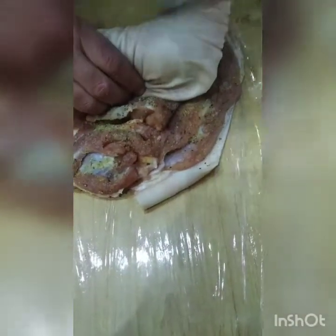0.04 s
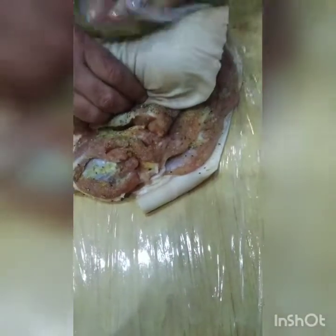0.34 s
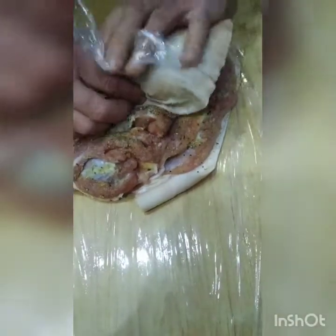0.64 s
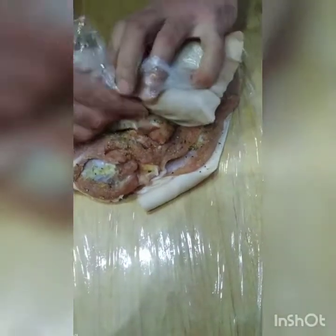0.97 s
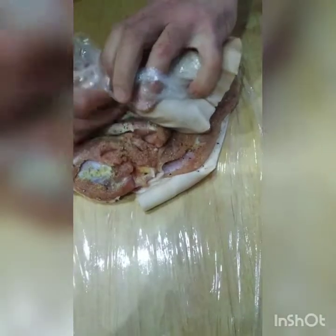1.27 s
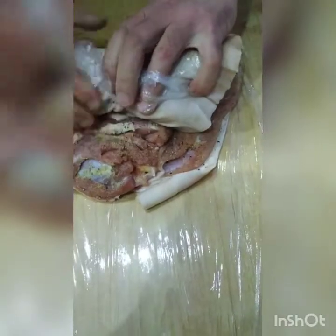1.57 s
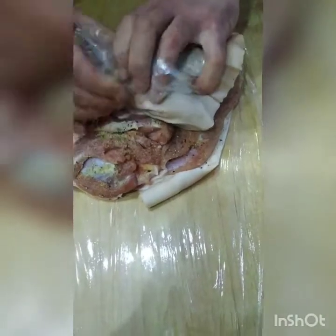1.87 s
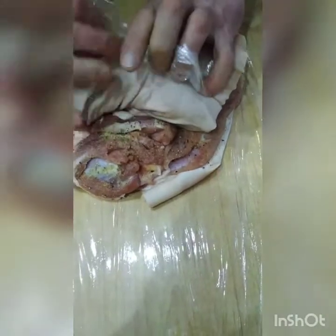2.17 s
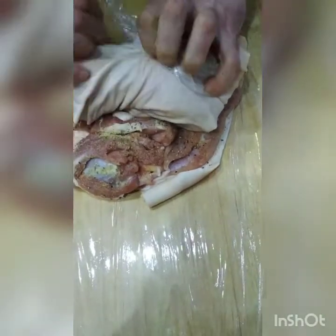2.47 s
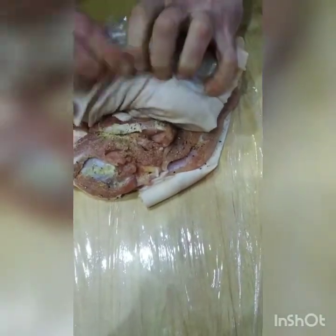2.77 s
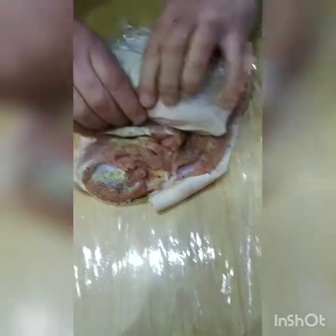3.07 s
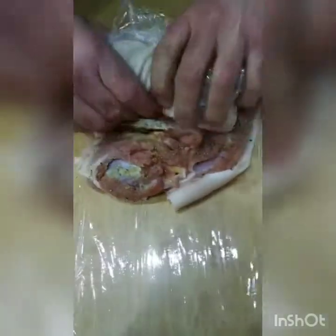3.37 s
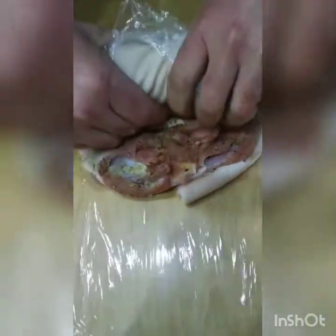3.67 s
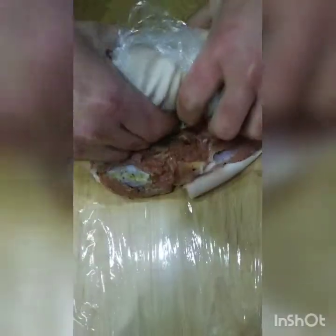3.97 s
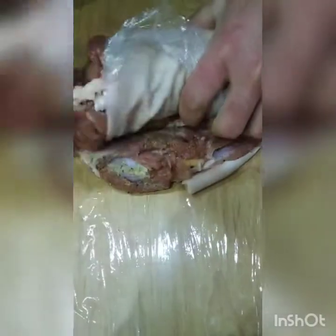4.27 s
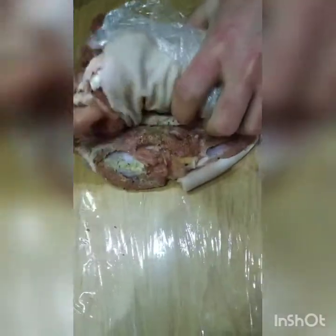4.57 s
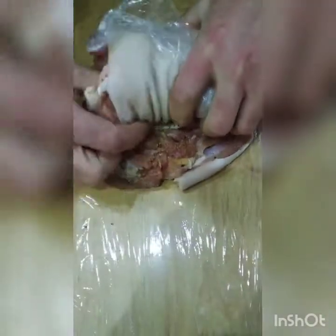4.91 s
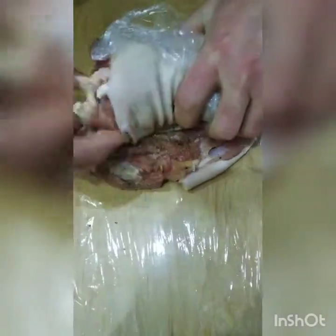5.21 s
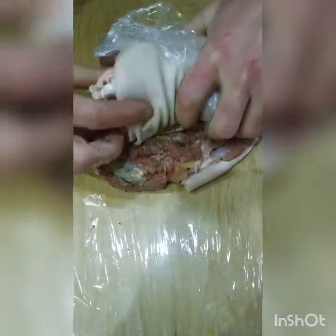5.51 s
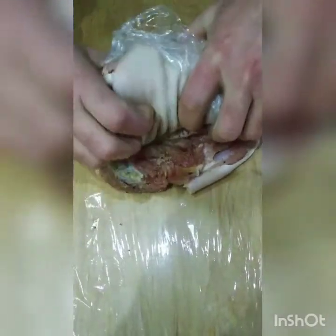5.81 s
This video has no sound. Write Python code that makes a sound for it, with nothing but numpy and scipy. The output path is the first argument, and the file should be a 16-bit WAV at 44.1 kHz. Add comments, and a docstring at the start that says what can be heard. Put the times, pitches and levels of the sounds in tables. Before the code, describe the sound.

Plastic cling film crinkles in uneven bursts as hands roll meat tightly in it on a board. Sharp little snaps, hollow pops and a few tiny squeaks stand out, with soft, dull rubs and bumps underneath. The crackling is strongest at the start and around two seconds, then becomes lighter and sparser. The microphone is close, in a small kitchen with a faint appliance hum.

```python
"""Dense showers of tiny clicks: cling film crinkles as hands roll meat tightly in it on a board.
Each click is a crease buckling under strain; taut creases snap sharply, wide folds pop or crunch,
and the moist film squeaks under a finger. Underneath, the roll rubs and bumps dully on the board
and a mains appliance hums. It all plays close to a two-port microphone in a small kitchen."""
import sys
import numpy as np
from scipy import signal
from scipy.fft import rfft, irfft
from scipy.io import wavfile

SR = 44100
rng = np.random.default_rng(int(sys.argv[2]) if len(sys.argv) > 2 else 0)


def digitize_waveform(pressure):
    """Quantize a signal to 16-bit integers and store it at the path in sys.argv[1].

    Rows of a 2-D input are taken as channels; values are limited to [-1, 1].
    """
    field = np.atleast_2d(pressure).T
    bounded = np.clip(field, -1, 1)
    quanta = np.round(bounded * 32767).astype(np.int16)
    wavfile.write(sys.argv[1], SR, quanta)


N = 257984
TIME, FREQS = np.arange(N) / SR, np.fft.rfftfreq(N, 1 / SR)


def amp(db):
    """Decibels to gain."""
    return 10 ** (np.asarray(db) / 20)


def unit_rms(x):
    """Scales a stereo pair so that its mid signal has rms 1."""
    return x / np.sqrt(np.mean(x.mean(0) ** 2) + 1e-20)


def curve_at(points, hz):
    """Reads a curve on a log-frequency axis."""
    f, value = np.transpose(points)
    return np.interp(np.log(hz + 1), np.log(f + 1), value)


def add(mix, s, sound):
    """Mixes a stereo sound in at time s."""
    part = mix[:, max(round(s * SR), 0):][:, :sound.shape[1]]
    part += sound[:, :part.shape[1]]


def convolve(x, response):
    """Causal filtering of each channel."""
    return signal.oaconvolve(np.atleast_2d(x), np.atleast_2d(response), axes=1)[:, :np.shape(x)[-1]]


def colour(x, points, size=2048):
    """Minimum-phase EQ, so clicks keep their sharp front."""
    gain_db = np.maximum(curve_at(points, abs(np.fft.fftfreq(size, 1 / SR))), -100)
    spectrum = np.exp(np.conj(signal.hilbert(np.log(amp(gain_db)))))
    return convolve(x, np.fft.ifft(spectrum).real)


def flutter(rate_hz):
    """Smooth random modulation of unit spread."""
    spectrum = rfft(rng.standard_normal(N)) / (1 + (FREQS / rate_hz) ** 2)
    wobble = irfft(spectrum * (FREQS > rate_hz / 4), N)
    return wobble / wobble.std()


def strokes(rows, attack_s, release_s):
    """One envelope per hand movement: strain builds, is held and relaxes."""
    start, length, db = np.transpose(rows)[:3, :, None]
    t = TIME - start
    return amp(db) * np.clip(t / attack_s, 0, 1) * np.exp(-np.clip((t - length) / release_s, 0, 20))


def power_sum(gains):
    """Unrelated noises add in power."""
    return np.sqrt(sum(g ** 2 for g in gains))


# Room decay: (frequency [Hz], time to fall 60 dB [s])
KITCHEN_DECAY = [(200, 0.012), (1000, 0.075), (5000, 0.071), (15000, 0.022)]
def kitchen(x, wet_db, size=16384):
    """Adds a short tail of sparse reflections that lingers longest in the mids."""
    t = np.arange(size) / SR
    taps = rng.standard_normal((2, size)) * (rng.random((2, size)) < .1) * (t > .003)
    hz, when, bands = signal.stft(taps, SR, nperseg=256)
    tail = signal.istft(bands * amp(-60 * when / curve_at(KITCHEN_DECAY, hz)[:, None]), SR)[1]
    return x + amp(wet_db) * convolve(x, tail / np.linalg.norm(tail[0]))


# Stereo image of the noise beds: (frequency [Hz], left-right correlation [-1 to 1])
PORT_LIKENESS = [(60, 0.7), (160, 0.89), (270, 0.94), (450, 0.37), (740, -0.26), (1200, 0.86),
                 (3000, -0.51)]
def diffuse(points):
    """Shaped stereo noise whose bass is alike at both ports."""
    left, other = rfft(rng.standard_normal((2, N)))
    likeness = curve_at(PORT_LIKENESS, FREQS)
    right = likeness * left + np.sqrt(1 - likeness ** 2) * other
    return unit_rms(irfft(np.array([left, right]) * amp(curve_at(points, FREQS)), N))


# Tone of the room's air: (frequency [Hz], relative level [dB])
AIR_SPECTRUM = [(18, -65), (30, -25.5), (103, -29.5), (161, -6.5), (210, -1), (345, -4), (426, -2.5),
                (499, -10), (666, -10), (844, -9.5), (1430, -13.5), (2060, -15.5), (2980, -15.5),
                (3580, -26), (16000, -17.5)]
def room_air(level_db=-58):
    """A soft, steady bed of air noise."""
    return amp(level_db) * diffuse(AIR_SPECTRUM)


# Partials of the hum: (harmonic [multiple of mains], level [dB])
HUM_PARTIALS = [(2, -84), (4, -65.5), (5, -67), (6, -70), (10, -67), (13, -70.5), (15, -71.5), (19, -80.5),
                (24, -75.5), (28, -72.5), (29, -67.5)]
def appliance_hum(mains_hz=50, waver_db=2.0, drift_turns=0.0025):
    """The wavering buzz of a mains appliance, its phases different at each port."""
    turns = mains_hz * TIME + drift_turns * flutter(7.5)
    hum = np.zeros((2, N))
    for harmonic, db in HUM_PARTIALS:
        offset = rng.random() + min(harmonic / 60, .3) * rng.random((2, 1))
        hum += amp(db) * np.sin(2 * np.pi * (harmonic * turns + offset))
    return hum * amp(waver_db * flutter(7.9))


# Body of the board: (frequency [Hz], relative level [dB])
BOARD_SPECTRUM = [(29, -72), (50, -37), (110, -33), (149, -17), (191, -4.5), (237, -5.5), (300, 3),
                  (443, 0.5), (489, -5.5), (678, -10), (731, -2.5), (1000, -18), (1300, -42), (2200, -120)]
# Drags of the roll: (start [s], length [s], level [dB])
ROLL_DRAGS = [(-.02, 0.021, -44), (.07, 0.027, -44.5), (.205, 0.057, -45.5), (.33, 0.2, -53.5),
              (.87, 0.16, -63), (1.65, 0.041, -59), (1.87, 0.14, -53), (1.995, 0.15, -42.5),
              (2.235, 0.093, -47.5), (2.36, .12, -56.5), (2.5, 0.21, -60), (3.98, 0.074, -53),
              (4.052, 0.018, -52)]
def rubbing():
    """The roll drags over the board: a dull rumble, a little to the left."""
    force = power_sum(strokes(ROLL_DRAGS, attack_s=0.0098, release_s=0.058))
    return force * diffuse(BOARD_SPECTRUM) * amp([[1.5], [-1.5]])


# Meat and knuckles on the board: (time [s], relative level [dB], pitch [Hz])
BOARD_BUMPS = [(0.088, -53.5, 334), (0.096, -38, 202), (.217, -33, 335), (0.334, -35, 325),
               (0.754, -43.5, 287), (1.485, -48, 262), (2.021, -33, 317), (2.087, -38, 397),
               (2.108, -40, 330), (2.253, -50, 327), (4.239, -52, 225), (4.991, -51, 210),
               (5.205, -48, 210), (5.36, -53, 223)]
def bumps(decay_s=0.00254, size=4096):
    """Soft blows push the board, which is damped within a few cycles and too small for deep bass."""
    t, out = np.arange(size) / SR, np.zeros((2, N))
    for s, db, hz in BOARD_BUMPS:
        push = t / decay_s * np.exp(1 - t / decay_s) * np.sin(2 * np.pi * hz * t)
        add(out, s, amp(db) * push * amp([[2.5], [-2.5]]))
    low_cut = signal.butter(5, 150, "high", fs=SR, output="sos")
    return kitchen(signal.sosfilt(low_cut, out), wet_db=-5.5)


# Moist film under a finger: (start [s], length [s], ring [Hz], relative level [dB])
FINGER_SQUEAKS = [(0.21, 0.026, 3870, -44), (1.822, 0.024, 1880, -55.5), (1.942, 0.028, 1720, -47.5),
                  (2.075, 0.02, 3920, -45), (2.204, 0.03, 4140, -44), (3.07, 0.015, 1730, -53.5),
                  (3.421, .012, 3180, -57), (4.38, 0.022, 4260, -56), (4.794, 0.054, 3070, -59)]
def squeaks(slips_per_s=900, ring_s=0.0038, size=512):
    """Quick, uneven slips ring one stretched patch of film."""
    t, out = np.arange(size) / SR, np.zeros((2, N))
    for s, length, hz, db in FINGER_SQUEAKS:
        slips = rng.standard_normal((2, SR // 10)) * (rng.random(SR // 10) < slips_per_s / SR)
        mode = np.exp(-t / ring_s) * np.sin(2 * np.pi * hz * t)
        radiated = np.gradient(mode)  # a small patch radiates its changes
        squeak = convolve(slips, radiated)[:, :round(length * SR)]
        add(out, s, amp(db) * unit_rms(squeak * signal.windows.tukey(squeak.shape[1])))
    return kitchen(colour(out, [(100, -46), (800, 2.5)]), wet_db=-11)


def creases(hz, ring_s, ring, scatter, left_db, scatter_s, size=512):
    """One stereo buckle per pitch: a tick with a brief ring, then scatter off hands, film and board."""
    t = np.arange(size) / SR
    tick = ring * np.exp(-t / ring_s) * np.cos(2 * np.pi * hz[:, None] * t) + (t == 0)
    paths = scatter * rng.standard_normal((len(hz), 2, size)) * np.exp(-t / scatter_s)
    lag = rng.integers(9, 15, len(hz))  # samples: the left port is farther away
    paths[:, 0] *= np.arange(size) > lag[:, None]
    paths[np.arange(len(hz)), 0, lag] += amp(left_db)
    paths[:, 1, 0] += 1
    clicks = signal.fftconvolve(paths, tick[:, None], axes=2)[..., :size]
    return clicks / np.linalg.norm(clicks, axis=(1, 2), keepdims=True)


# Bright voice of the film, also in the snaps and the shower: (frequency [Hz], gain [dB])
FILM_SPECTRUM = [(290, -51), (500, -12.5), (740, -9.5), (1260, -10), (1480, -8.5), (2190, -6), (2500, -7),
                 (3700, -5.5), (3980, -3.5), (5020, -3.5), (9490, 0.5), (11300, 0.5), (15700, 1),
                 (16600, -30)]
def lone_clicks(clicks, spread_db, largest):
    """Each crease flips once, either way, at a random moment; a few are louder than the rest."""
    out = np.zeros((2, N))
    for click, (when, rank, side) in zip(clicks, rng.random((len(clicks), 3))):
        boost_db = spread_db * min(-np.log(1 - rank), largest)
        add(out, when * N / SR, np.sign(side - .5) * amp(boost_db) * click)
    return unit_rms(colour(out, FILM_SPECTRUM))


# Fingertips on the wrap: (start [s], length [s], level [dB])
FINGER_PRESSES = [(.08, 0.17, -48), (.47, 0.12, -50), (1.48, 0.14, -54), (1.92, .52, -45.5),
                  (2.5, .12, -51), (3.5, 0.56, -60), (4.42, 0.41, -64), (4.84, 0.077, -61),
                  (5.17, 0.36, -66.5), (5.56, 0.32, -60)]
def pressing():
    """Film pressed onto moist meat gives way in small, separate, lower-pitched crackles."""
    force = power_sum(strokes(FINGER_PRESSES, attack_s=0.019, release_s=0.032))
    pitches = np.geomspace(1200, 7000, 800)
    clicks = creases(pitches, ring_s=0.00061, ring=0.14, scatter=0.093, left_db=0, scatter_s=0.0042)
    return force * lone_clicks(clicks, spread_db=2.0, largest=3)


def place_clicks(cues, clicks, spectrum):
    """Places one coloured click per cue; its level is its energy spread over one millisecond."""
    out = np.zeros((2, N))
    for (s, db, _), click in zip(cues, clicks):
        click = colour(click, spectrum)
        add(out, s, amp(db) * click / np.sqrt((click ** 2).mean(0).sum() * 1000 / SR))
    return out


# Fuller voice of a wide fold: (frequency [Hz], gain [dB])
FOLD_SPECTRUM = [(60, -63), (250, -30), (600, -3), (1600, -3.5), (4000, -4), (8000, -14), (16000, -12)]
# Folds popping over: (time [s], level over 1 ms [dB], ring [Hz])
FOLD_POPS = [(.136, -39, 1410), (.2192, -26, 3600), (.2205, -26, 1510), (.3366, -31, 900),
             (.5326, -27.5, 1710), (0.7535, -37, 1700), (.9076, -39.5, 1620), (.965, -38, 2200),
             (1.0512, -42, 1700), (1.2574, -41, 1600), (1.3581, -41, 3200), (1.578, -42, 3500),
             (1.69, -45, 1500), (1.949, -33, 1800), (1.9763, -29, 2200), (2.0912, -26, 3800),
             (2.1085, -30.5, 3900), (2.152, -30.5, 1300), (2.2557, -31.5, 1890), (2.298, -32, 3400),
             (2.3722, -40, 3030), (2.47, -34, 1500), (2.559, -41, 2200), (2.64, -46, 1400),
             (3.075, -45, 1800), (3.5694, -45, 2500), (3.6975, -40, 1800), (3.8793, -45, 2200),
             (4.379, -46, 4000), (4.3945, -40, 4300), (4.472, -47, 1300), (4.8101, -44, 3000),
             (4.885, -43.5, 1200), (5.1841, -48, 2400), (5.5297, -47, 3400)]
def pops():
    """A wide, slack fold turns over with a sharp front and a low, hollow ring."""
    pitches = np.transpose(FOLD_POPS)[2]
    clicks = creases(pitches, ring_s=0.00064, ring=0.21, scatter=0.1, left_db=-3, scatter_s=0.0017)
    return kitchen(place_clicks(FOLD_POPS, clicks, FOLD_SPECTRUM), wet_db=-8)


# Single creases snapping through: (time [s], level over 1 ms [dB], ring [Hz])
CREASE_SNAPS = [(.0776, -28, 9000), (.0826, -25, 13000), (.1345, -23, 8400), (.1825, -27, 14200),
                (.1937, -22, 11000), (.1995, -24, 10400), (.4086, -29, 11900), (.5315, -22, 8000),
                (.5324, -24, 8400), (.6675, -30, 8500), (.6694, -28, 7660), (.671, -31, 14000),
                (.7357, -25.5, 9450), (.7612, -35, 9000), (.8801, -44, 9500), (.8874, -36, 8400),
                (.9077, -32, 8700), (.9661, -40, 9000), (.995, -30, 9500), (1.0443, -25, 11500),
                (1.0513, -32, 9300), (1.1053, -30.5, 9500), (1.2853, -41, 9000), (1.3495, -32, 5850),
                (1.3928, -38, 8800), (1.4874, -37, 13200), (1.5212, -45, 5500), (1.5779, -32.5, 4940),
                (1.681, -31.5, 8600), (2.0895, -28, 13000), (2.091, -25, 9000), (2.2173, -33, 11000),
                (2.264, -20.5, 13400), (2.3123, -20, 12700), (2.3627, -28, 10800), (2.399, -31, 9200),
                (2.4041, -24, 9200), (2.431, -26.5, 9200), (2.4343, -23.5, 9250), (2.5085, -28, 9750),
                (2.7193, -38, 9500), (3.049, -33, 10900), (3.1912, -30, 12000), (3.1937, -22.5, 9900),
                (3.197, -31, 11000), (3.2036, -28, 9900), (3.416, -32, 14600), (3.4242, -40, 8200),
                (3.4836, -37, 15000), (3.4916, -35, 14800), (3.5753, -43, 14800), (3.745, -40, 14500),
                (3.8296, -40.5, 15000), (4.149, -45, 14000), (4.16, -36, 14600), (4.1653, -44, 11900),
                (4.3769, -37, 9200), (4.3944, -34.5, 5200), (4.4272, -39, 10900), (4.4324, -39, 11300),
                (4.4876, -46, 10200), (4.5599, -41, 9300), (4.6331, -38, 14700), (4.76, -40, 6700),
                (4.8226, -33, 9600), (4.861, -35, 9200), (4.8766, -32, 9600), (4.9341, -37, 11800),
                (5.136, -33, 8000), (5.1401, -33, 9700), (5.2794, -57, 10000), (5.383, -42.5, 9500),
                (5.4293, -44, 12500), (5.4345, -31.5, 9900), (5.48, -40, 9300), (5.5737, -47, 8500),
                (5.7009, -35, 12500), (5.8014, -35.5, 6500), (5.8142, -37, 9500)]
def snaps():
    """A large, taut crease flips at once with its own brief, bright ring."""
    pitches = np.transpose(CREASE_SNAPS)[2]
    clicks = creases(pitches, ring_s=0.00018, ring=0.75, scatter=0.08, left_db=-7, scatter_s=0.0018)
    return kitchen(place_clicks(CREASE_SNAPS, clicks, FILM_SPECTRUM), wet_db=-12)


def ticks():
    """Again and again a somewhat larger crease flips and stands clear of the shower."""
    pitches = np.linspace(2500, 15500, 600)
    clicks = creases(pitches, ring_s=0.00059, ring=0.29, scatter=0.067, left_db=-7, scatter_s=0.0044)
    return lone_clicks(clicks, spread_db=0.5, largest=3.1)


def shower(level_db, base_per_s=3600, base_db=-40.5, crowding=.4, count=760, size=2560):
    """Crease after crease comes under strain and gives a short run of clicks in its own colour."""
    starts = np.linspace(-size, N, count).astype(int)
    middles = np.clip(starts + size // 2, 0, N - 1)
    per_s = base_per_s * amp(crowding * (level_db[middles, None] - base_db))
    chance = per_s * N / SR / count / size * 2 * np.hanning(size)
    strength = amp(np.minimum(rng.exponential(1, (count, size)), 1.4))
    draw = rng.uniform(-1, 1, (count, size))  # a crease flips either way
    runs = np.sign(draw) * (abs(draw) < chance) * strength / np.sqrt(per_s)  # same power at any density
    golden_steps = np.arange(count) * (np.sqrt(5) - 1) / 2  # keeps neighbours apart in pitch
    pitches = 1500 + 14000 * (golden_steps + rng.random(count) / 5) % 14000
    clicks = creases(pitches, ring_s=0.00026, ring=0.5, scatter=0.13, left_db=0, scatter_s=0.0029)
    out = np.zeros((2, N + size))
    for start, run in zip(starts, signal.fftconvolve(runs[:, None], clicks, axes=2)):
        add(out, (start + size) / SR, run)
    return out[:, size:]


# Faint rustle of the held film between grips: (time [s], relative level [dB])
HELD_RUSTLE = [(0, -40), (1.3, -47.5), (1.46, -57), (1.52, -49), (1.65, -46), (3.7, -50), (4.2, -52.5),
               (4.75, -48), (5.05, -52.5), (5.28, -60), (5.5, -55.5), (5.85, -55.5)]
# Broad folds collapsing with a papery crunch: (start [s], length [s], relative level [dB])
FOLD_CRUNCHES = [(.125, .012, -36), (.2175, 0.006, -34), (.34, .006, -44), (.531, 0.004, -28),
                 (.745, 0.037, -33.5), (.945, 0.014, -35), (1.222, .012, -49), (1.35, 0.0069, -33.5),
                 (1.935, 0.097, -32), (2.253, 0.01, -25.5), (2.296, 0.016, -25.5), (2.39, 0.0046, -49),
                 (2.428, .005, -39), (2.548, .006, -41), (3.065, 0.015, -37.5), (3.243, .006, -38.5),
                 (3.694, .005, -42), (4.805, .02, -47)]
# Grips and tugs: (start [s], length [s], relative level [dB], slack-fold weight [dB])
FINGER_GRIPS = [(-.037, 0.031, -25.5, -1.5), (0.057, 0.084, -29.5, -2.5), (0.159, 0.072, -32, 4),
                (0.32, 0.066, -35, 1.5), (0.391, 0.034, -37.5, 1), (0.441, 0.084, -31.5, -2.5),
                (0.646, 0.17, -40, -9), (0.843, 0.13, -38, -4), (1.001, 0.1, -40.5, -14),
                (1.172, 0.1, -41, -14), (1.315, 0.044, -40.5, -6), (1.553, 0.089, -43, -15),
                (1.642, 0.064, -37.5, -2.5), (1.759, 0.16, -38.5, 0), (1.86, 0.089, -33.5, 0),
                (1.968, .18, -34, 3.5), (2.137, 0.21, -31.5, -2), (2.365, 0.13, -35.5, 0),
                (2.489, 0.13, -41, 2), (2.621, 0.068, -37.5, 0), (2.773, 0.095, -44, 5),
                (2.902, 0.082, -37.5, -2), (3, 0.12, -38, -4.5), (3.145, 0.054, -36.5, -8),
                (3.281, 0.031, -42.5, 2.5), (3.39, 0.071, -49, 4.5), (3.767, 0.11, -51.5, 1),
                (3.884, 0.13, -43.5, -0.5), (3.939, 0.15, -43, 4), (4.337, 0.13, -47, -6),
                (4.495, 0.11, -48.5, -18), (4.778, 0.11, -48.5, 0), (5.05, 0.084, -47.5, -6),
                (5.1, .025, -44.5, -5), (5.372, 0.1, -54.5, -7), (5.5, 0.2, -50, -1.5),
                (5.633, 0.078, -55, -7), (5.774, 0.071, -50, 7)]
def crinkle(slack_db=1.5, taut_db=-0.5, taut_db_per_db=0.07, usual_db=-39, ticks_db=-8, trim_db=-0.49):
    """Harder handling sets off more and louder creases; slack folds speak low, taut creases high."""
    grips = strokes(FINGER_GRIPS, attack_s=0.038, release_s=0.042)
    crunches = strokes(FOLD_CRUNCHES, attack_s=0.0022, release_s=0.025)
    rustle = amp(np.interp(TIME, *np.transpose(HELD_RUSTLE)))
    level = power_sum([rustle, *grips])
    level_db = 20 * np.log10(level)
    slack_grips = grips * amp(np.transpose(FINGER_GRIPS)[3, :, None])
    slack_gain = power_sum([amp(slack_db) * power_sum([rustle, *slack_grips]), *crunches])
    taut_gain = level * amp(taut_db + taut_db_per_db * (level_db - usual_db))  # harder is brighter
    clicks = shower(level_db) * amp(-0.35 * flutter(62))  # a slight, fast flicker in level
    clicks = unit_rms(kitchen(colour(clicks, FILM_SPECTRUM), wet_db=-6))
    clicks = unit_rms(clicks + amp(ticks_db) * ticks())
    lows = signal.sosfiltfilt(signal.butter(2, 3000, fs=SR, output="sos"), clicks)
    highs = signal.sosfiltfilt(signal.butter(3, 11000, "high", fs=SR, output="sos"), clicks)
    mids = clicks - lows - highs
    return amp(trim_db) * (lows * slack_gain + mids * level + highs * taut_gain)


# Colour of the film at the left port: (frequency [Hz], gain [dB])
LEFT_PORT_EQ = [(1000, 1.5), (2500, -1), (5000, -1.5), (9000, -3.5), (14000, 1)]
def scene():
    """The film up front, over the board and the room."""
    left, right = crinkle() + snaps() + pops() + pressing() + squeaks()
    film = np.vstack([colour(left, LEFT_PORT_EQ), right])
    return film + rubbing() + bumps() + appliance_hum() + room_air()


def record(dry):
    """The recorder's band limit: a steep high cut just under 16 kHz."""
    high_cut = signal.firwin(511, 15950, window=("kaiser", 9), fs=SR)
    return signal.oaconvolve(dry, high_cut[None], "same", axes=1)


dry = scene()
out = record(dry)
digitize_waveform(out)
```